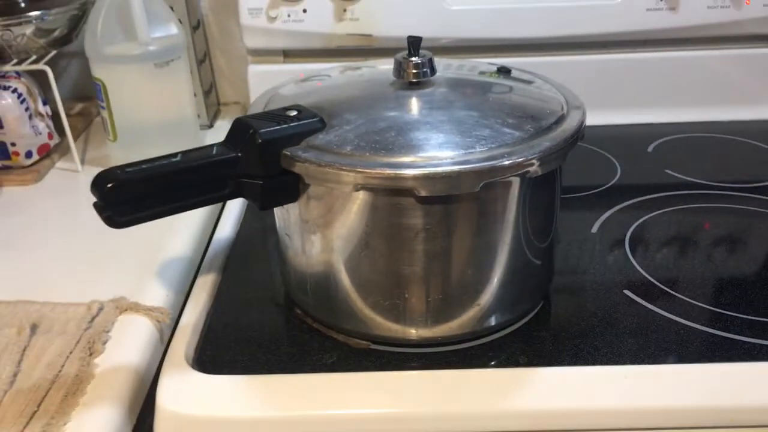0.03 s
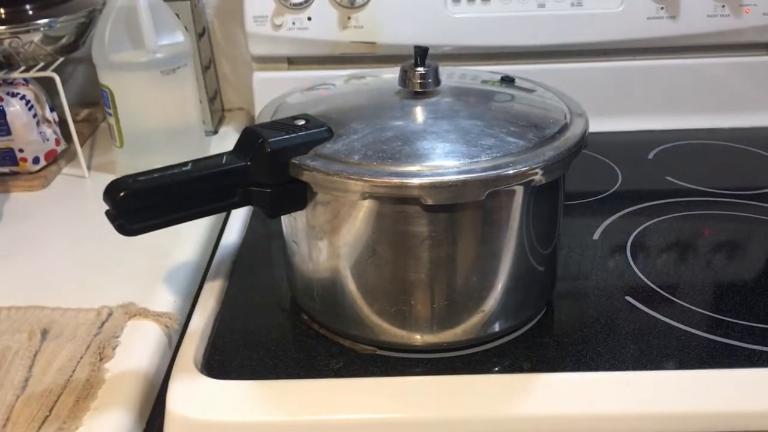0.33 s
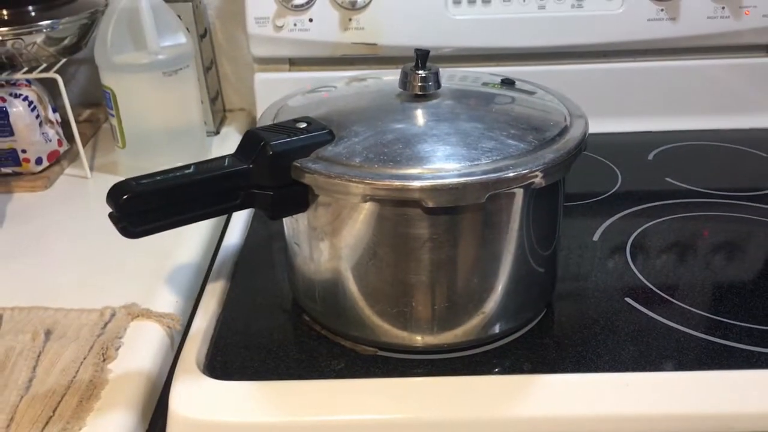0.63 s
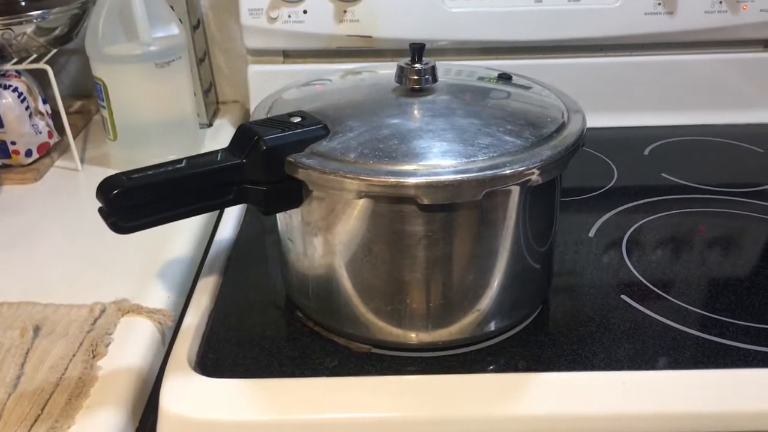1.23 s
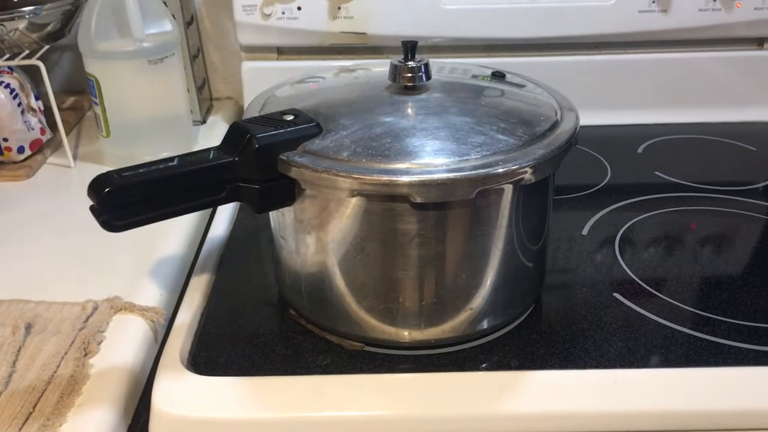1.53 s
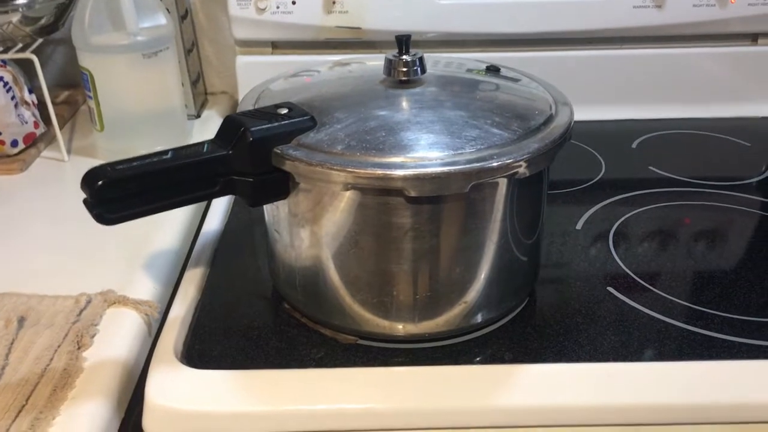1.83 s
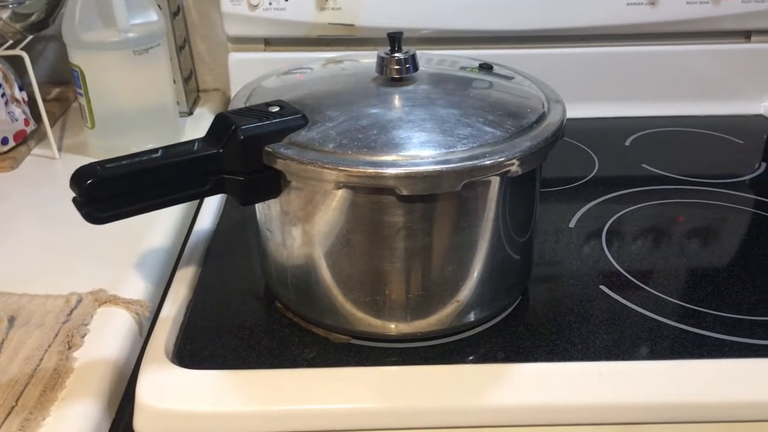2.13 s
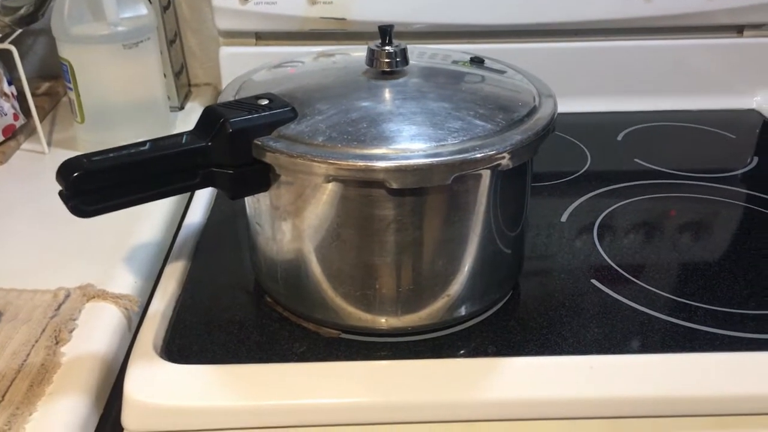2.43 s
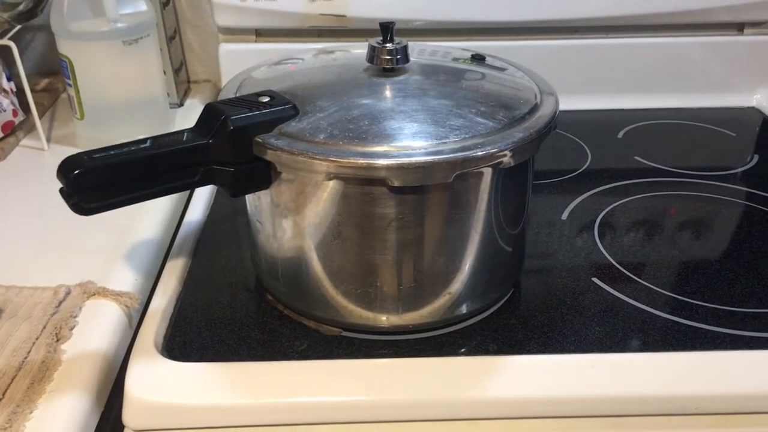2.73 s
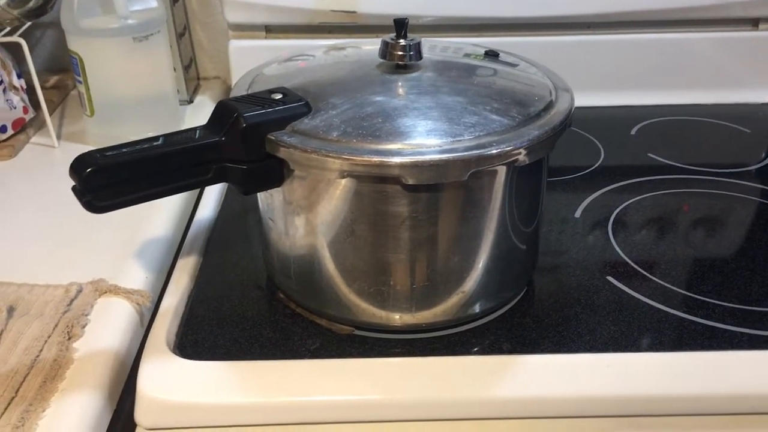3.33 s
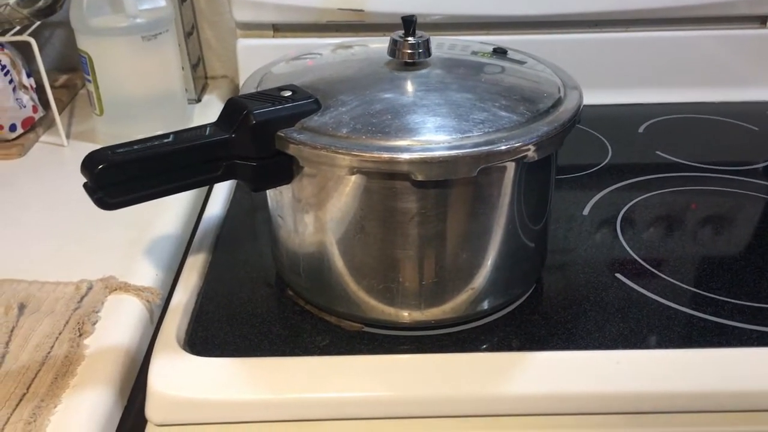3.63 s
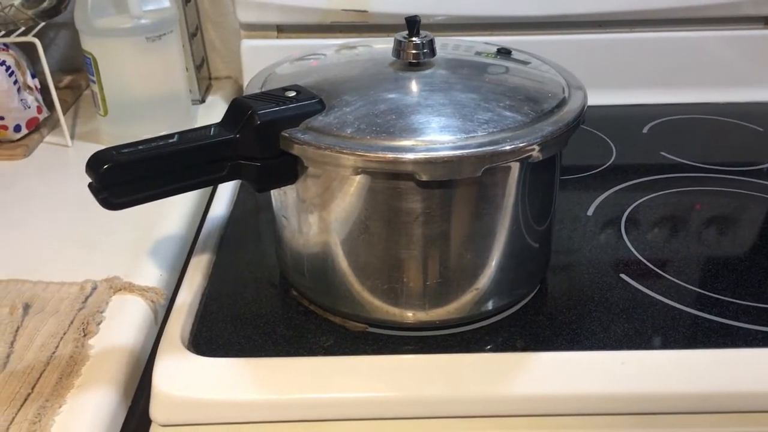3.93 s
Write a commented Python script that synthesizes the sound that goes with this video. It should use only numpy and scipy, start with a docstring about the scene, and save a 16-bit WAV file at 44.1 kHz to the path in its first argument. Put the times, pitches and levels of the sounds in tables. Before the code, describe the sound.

Steam chatters from a pressure cooker in quick, sharp spurts, heard nearby in a small kitchen. The weight rattles lightly on the lid between puffs and later knocks harder, over a faint simmer and low room hum.

```python
"""A pressure cooker steams on a stove in a small, hard kitchen. From the start a low hum fills the
room, the pot simmers and the vent leaks steadily. The weight rocks on the vent pipe: each tilt lets
out a puff of turbulent hiss, about twenty a second, and between puffs the weight drops back and sets
the lid ringing. The loudest puff and knock come near 1.6 s; from about 2.7 s on the knocks are
generally firmer."""
import sys
import numpy as np
from scipy import signal
from scipy.fft import rfft, irfft
from scipy.io import wavfile

SR = 44100
rng = np.random.default_rng(int(sys.argv[2]) if len(sys.argv) > 2 else 0)


def wav_record(signal):
    """Record a signal, one row per channel, as 16-bit PCM in the file named by sys.argv[1]."""
    frames = np.transpose(np.atleast_2d(signal))
    bounded = np.clip(frames, -1, 1)
    # unit amplitude maps onto the largest positive 16-bit level
    quanta = np.round(bounded * 32767).astype(np.int16)
    wavfile.write(sys.argv[1], SR, quanta)


N = 176400


def amp(db):
    """Amplitude ratio of a level in decibels."""
    return 10 ** (np.asarray(db) / 20)

def unit(x):
    """Normalisation to rms 1."""
    return x / np.sqrt(np.mean(x ** 2) + 1e-20)

def at_frequency(points, hz):
    """Interpolation of a table on a logarithmic frequency axis."""
    f, value = np.transpose(points)
    return np.interp(np.log(hz + 1), np.log(f + 1), value)

def add(mix, onset, sound):
    """Superposition of a sound on the mix, onset in seconds."""
    part = mix[max(round(onset * SR), 0):][:len(sound)]
    part += sound[:len(part)]

def bins():
    """Frequencies of the full-length Fourier spectrum."""
    return np.fft.rfftfreq(N, 1 / SR)

def noise(gain):
    """Spectral shaping of white noise, at rms 1."""
    return unit(irfft(rfft(rng.standard_normal(N)) * gain, N))

def wander(hz):
    """Random fluctuation: noise low-passed at hz."""
    return noise(1 / (1 + (bins() / hz) ** 4))

def rumble_and_hum():
    """Amplitude modulation: low noise and a wavering mains hum rise and fall under one envelope."""
    # spectrum of the kitchen rumble (f/Hz, relative level/dB)
    spectrum = [(12, -49), (24, -32), (30, -31), (37, -9), (45, -1), (62, -8.5), (75, -2), (100, -11),
                (180, -16.5), (500, -47.5), (1500, -10), (15000, -60)]
    # envelope of rumble and hum (t/s, level/dB)
    envelope = [(0.0, -58.5), (0.63, -57), (0.66, -63), (0.76, -58), (1.85, -62.5), (1.89, -53),
                (1.97, -61.5), (3.32, -63), (3.35, -57), (3.62, -61), (3.66, -68), (3.75, -60),
                (3.97, -58.5), (4.0, -67)]
    t = np.arange(N) / SR
    mains_hz = 60.2
    rumble = amp(0.5) * noise(amp(at_frequency(spectrum, bins())))
    hum = amp(-1 + 0.51 * wander(hz=10)) * unit(np.sin(2 * np.pi * mains_hz * t))
    return (rumble + hum) * amp(np.interp(t, *np.transpose(envelope)))

def simmer():
    """Transmission loss: the closed pot muffles bursting bubbles and the wash of boiling water."""
    # strength of the boiling (t/s, relative level/dB)
    envelope = [(0.0, -64), (0.1, -63), (0.15, -57), (0.81, -66), (1.29, -55.5), (1.3, -61.5),
                (1.82, -59.5), (2.15, -69.5), (2.95, -54.5), (3.01, -69), (3.11, -58.5), (3.17, -81),
                (3.21, -62), (3.44, -54), (3.84, -63.5), (4.0, -69)]
    # hollow spectrum heard through the wall (f/Hz, relative level/dB)
    through_wall = [(100, -17), (190, -22), (240, -11), (280, -4), (315, -6), (345, -14), (400, -9),
                    (460, -15), (600, -13), (900, -14), (2000, -75)]
    t = np.arange(N) / SR
    bubbles_per_s = 32
    bubbles = (rng.random(N) < bubbles_per_s / SR) * rng.standard_normal(N) * amp(18)
    water = bubbles + rng.standard_normal(N)
    muffled = unit(irfft(rfft(water) * amp(at_frequency(through_wall, bins())), N))
    return muffled * amp(np.interp(t, *np.transpose(envelope)) - 2.5)

def metal_resonance(x, spectrum):
    """Resonance: the weight and lid raise narrow peaks on a broad spectrum; white noise keeps its power."""
    # resonances of weight and lid (f/Hz, bandwidth/Hz, relative level/dB)
    modes = [(1570, 80, -3), (1970, 35, 1), (2210, 80, -2), (2470, 45, -2), (3310, 45, 0), (3465, 40, 0),
             (3605, 40, 2), (3858, 48, 5), (4040, 70, -1), (4493, 48, 5), (4688, 43, 5), (5187, 50, 6),
             (5410, 40, 2), (5512, 32, 4), (5675, 48, 3), (5791, 35, 2), (5944, 60, 0), (6126, 60, 1),
             (6282, 55, 2), (6545, 55, 2), (6750, 65, 2), (6891, 48, 3), (7095, 90, 4), (7427, 38, 4),
             (7610, 50, 0), (8110, 60, 0), (8300, 60, 1), (8489, 48, 3), (8748, 45, 1)]
    f = bins()
    peak_power = sum(amp(db + 1.5) ** 2 / (1 + (2 * (f - hz) / width) ** 2) for hz, width, db in modes)
    ring = np.sqrt(1 + peak_power)
    minimum_phase = -signal.hilbert(np.log(np.r_[ring, ring[-2:0:-1]])).imag[:len(f)]
    gain = unit(amp(at_frequency(spectrum, f)) * ring)
    return irfft(rfft(x) * gain * np.exp(1j * minimum_phase), N)

def steam():
    """Turbulent jet noise: each opening of the vent adds its power to that of a steady leak."""
    # puffs (peak t/s, half-power duration/s, relative hiss level/dB, rush level re hiss/dB)
    puffs = [(0.018, 0.034, -35.5, -14.5), (0.082, 0.025, -35, -16), (0.106, 0.017, -39.5, -14),
             (0.154, 0.023, -32, -15), (0.208, 0.023, -31.5, -17), (0.252, 0.02, -31, -16),
             (0.317, 0.026, -37, -14), (0.342, 0.017, -38, -22), (0.384, 0.027, -34, -22),
             (0.442, 0.02, -33, -17), (0.495, 0.031, -31, -28), (0.581, 0.042, -32.5, -17.5),
             (0.646, 0.021, -33.5, -14), (0.709, 0.027, -31.5, -16.5), (0.784, 0.032, -34.5, -16),
             (0.833, 0.019, -31.5, -14.5), (0.888, 0.028, -35, -13), (0.931, 0.025, -35, -13),
             (0.973, 0.023, -40, -22), (0.991, 0.015, -36, -11), (1.04, 0.03, -35.5, -14.5),
             (1.098, 0.028, -35.0, -22), (1.146, 0.037, -41, -22), (1.192, 0.034, -36.5, -16),
             (1.236, 0.023, -32.0, -15), (1.266, 0.038, -38.5, -13), (1.329, 0.016, -34, -14),
             (1.372, 0.02, -27.5, -16), (1.413, 0.03, -33, -17), (1.466, 0.015, -32.5, -10.5),
             (1.516, 0.016, -30.8, -11.5), (1.559, 0.015, -27.5, -14.5), (1.613, 0.018, -25, -18),
             (1.657, 0.038, -37, -14), (1.721, 0.02, -34.5, -9.5), (1.804, 0.022, -34, -15.5),
             (1.825, 0.018, -33.5, -8.5), (1.857, 0.02, -31.9, -8), (1.883, 0.038, -36.5, -18),
             (1.939, 0.023, -33, -15.5), (2.009, 0.039, -38.1, -13), (2.046, 0.018, -39.5, -9),
             (2.101, 0.041, -35.5, -11.5), (2.17, 0.034, -34.4, -11), (2.214, 0.017, -34.5, -11),
             (2.265, 0.029, -34.5, -12.5), (2.318, 0.027, -36.5, -11.5), (2.36, 0.032, -41.5, -10),
             (2.39, 0.025, -34, -15), (2.436, 0.033, -36.0, -14.5), (2.461, 0.042, -41.5, -12.5),
             (2.51, 0.021, -36, -11.5), (2.566, 0.021, -32, -11.5), (2.61, 0.019, -38, -12),
             (2.66, 0.024, -35, -12.5), (2.695, 0.025, -34.6, -16.5), (2.757, 0.032, -36, -14),
             (2.802, 0.02, -35.0, -14), (2.845, 0.033, -32.5, -12), (2.89, 0.021, -30.5, -13.5),
             (2.937, 0.038, -32, -15), (3.001, 0.014, -33, -15), (3.03, 0.024, -30.5, -18),
             (3.082, 0.042, -35.5, -14.5), (3.136, 0.021, -36, -13.5), (3.188, 0.024, -33.5, -13.5),
             (3.234, 0.02, -34, -10.5), (3.286, 0.025, -30.6, -14), (3.334, 0.022, -31.5, -17),
             (3.374, 0.027, -33, -11), (3.394, 0.023, -41, -18), (3.43, 0.029, -33, -14.5),
             (3.482, 0.023, -35.5, -16), (3.514, 0.019, -33.0, -12), (3.541, 0.029, -39, -11),
             (3.576, 0.021, -35.5, -9.5), (3.622, 0.024, -33.5, -14.5), (3.661, 0.026, -35.5, -11),
             (3.713, 0.017, -34.5, -15), (3.753, 0.023, -30.5, -14), (3.799, 0.017, -29, -13),
             (3.862, 0.013, -35, -12.5), (3.895, 0.031, -36.5, -12), (3.939, 0.019, -29, -15),
             (3.985, 0.023, -32, -14.5)]
    # spectrum of the jet's hiss (f/Hz, relative level/dB)
    hiss_spectrum = [(500, -63), (1500, -28.5), (2800, -13.5), (4000, -7), (4900, -5.5), (5600, -1.5),
                     (7100, -2.5), (7900, -3.5), (8800, -4), (9700, -5.5), (10500, -13), (11300, -10),
                     (13500, -12.5), (15800, -9.5)]
    # spectrum of the lower rush under the weight (f/Hz, relative level/dB)
    rush_spectrum = [(120, -22), (300, -6), (500, -18), (750, -5), (1200, -1), (1800, -3), (2250, -1),
                     (3000, -1.5), (5000, -15)]
    t = np.arange(N) / SR
    rise_share, squareness = 0.43, 2.115  # an exponent of 2 gives a Gaussian puff
    hiss_power, rush_power = np.full(N, amp(-62) ** 2), np.full(N, amp(-68.5) ** 2)  # the leak
    for peak, length, db, rush_db in puffs:
        near = slice(max(int((peak - 2 * length) * SR), 0), int((peak + 2 * length) * SR))
        flank_s = length * np.where(t[near] < peak, rise_share, 1 - rise_share)
        opening = 0.5 ** (abs((t[near] - peak) / flank_s) ** squareness)
        hiss_power[near] += opening * amp(db) ** 2
        rush_power[near] += opening * amp(db + rush_db) ** 2
    flutter = wander(hz=238)
    hiss = rng.standard_normal(N) * np.sqrt(hiss_power) * amp(0.5 + 0.9 * flutter)
    rush = rng.standard_normal(N) * np.sqrt(rush_power) * amp(0.5 + 1.75 * flutter)
    leak_fizz = amp(-52) * noise(1 - 1 / (1 + (bins() / 10200) ** 6))  # above 10.2 kHz
    return metal_resonance(hiss, hiss_spectrum) + metal_resonance(rush, rush_spectrum) + leak_fizz

def lid_knock(detune):
    """Impact excitation: a dull thud and the lid's damped modes, each mistuned by about detune."""
    # modes of the lid (f/Hz, relative level/dB, T60/s)
    modes = [(287, -31, .07), (904, -13, 0.065), (992.6, -0.5, 0.061), (1000, -13, 0.074),
             (1224, -8.5, 0.022), (1593, -8.5, 0.043), (1959, -6, 0.037), (2460, -29, .025)]
    t = np.arange(SR // 8) / SR
    rise_s, thud_decay_s = 0.00035, 0.003
    tuning = rng.normal(1, detune, len(modes)) if detune else np.ones(len(modes))
    ring = sum(amp(db - 60 * t / t60) * np.sin(2 * np.pi * hz * ratio * t)
               for (hz, db, t60), ratio in zip(modes, tuning))
    thud_band = signal.butter(2, [400, 1800], "band", fs=SR, output="sos")
    thud = unit(signal.sosfilt(thud_band, rng.standard_normal(len(t)))) * np.exp(-t / thud_decay_s)
    return (ring + amp(-6) * thud) * (1 - np.exp(-t / rise_s))

def rocking_weight():
    """Repeated impacts: firm landings of the weight amid light chatter, a Poisson train of taps."""
    # landings on the vent pipe (t/s, relative level/dB)
    landings = [(0.127, -49), (0.169, -45), (0.209, -56), (0.233, -43.5), (0.283, -47.5), (0.356, -45.5),
                (0.401, -45), (0.464, -48), (0.502, -45), (0.53, -44.5), (0.555, -43), (0.593, -50),
                (0.618, -43), (0.808, -51), (0.858, -46.5), (0.909, -43.5), (1.091, -43), (1.131, -47),
                (1.193, -46.5), (1.23, -49), (1.347, -48), (1.388, -46.5), (1.415, -46), (1.444, -43.5),
                (1.486, -46), (1.537, -47), (1.582, -36), (1.639, -42), (1.688, -44), (1.724, -57),
                (1.826, -46), (1.853, -49), (1.879, -48), (1.905, -41), (1.936, -46.5), (2.136, -47.5),
                (2.162, -52), (2.193, -45.5), (2.233, -46.5), (2.272, -48), (2.416, -47.5), (2.479, -49),
                (2.564, -52), (2.672, -41.5), (2.815, -44), (2.869, -44), (2.908, -42), (2.94, -40),
                (3.014, -43), (3.052, -39.5), (3.084, -48), (3.2, -43), (3.252, -41.5), (3.31, -41),
                (3.349, -39), (3.382, -46.5), (3.401, -44), (3.439, -41.5), (3.462, -39.5), (3.494, -42.5),
                (3.54, -45), (3.602, -41), (3.644, -41), (3.691, -42), (3.729, -41.5), (3.764, -42),
                (3.787, -48), (3.915, -40), (3.959, -41)]
    taps_per_s = 26
    taps = (rng.random(N) < taps_per_s / SR) * rng.uniform(-1.34, 1, N)
    chatter = signal.oaconvolve(taps, lid_knock(detune=0))[:N]
    knocks = np.zeros(N)
    for onset, db in landings:
        add(knocks, onset, amp(db + 3.5) * lid_knock(detune=0.0086))
    return knocks + amp(-47) * chatter

def room_tail():
    """Diffuse reverberation: noise decays exponentially, each band at its own rate."""
    # reverberation time of the kitchen (f/Hz, T60/s)
    decay_times = [(200, 0.47), (1000, 0.26), (5000, 0.52), (15000, 0.23)]
    hz, t, spectrogram = signal.stft(rng.standard_normal(SR // 2), SR, nperseg=256)
    decay = amp(-60 * t / at_frequency(decay_times, hz)[:, None])
    response = signal.istft(spectrogram * decay, SR, nperseg=256)[1]
    response[:SR // 200] = 0  # the tail arrives after 5 ms
    return response / np.linalg.norm(response)

def kitchen(x, room_db):
    """Reflection: direct sound, close echoes, then a diffuse room tail whose colour slowly drifts."""
    out = x.copy()
    echoes = rng.random(size=(8, 2))  # from the lid, hob and back panel
    earliest_s, spread_s = 0.000973, 0.004
    for lag, polarity in echoes:
        echo = x * np.sign(polarity - 0.5) * amp(-15) / np.sqrt(len(echoes))
        add(out, earliest_s + lag * spread_s, echo)
    drift = np.array([wander(hz=2.12) for _ in range(4)])
    for share in drift / np.linalg.norm(drift, axis=0):  # four tails share a constant power
        out += amp(room_db) * signal.fftconvolve(x * share, room_tail())[:N]
    return out / np.sqrt(1 + amp(room_db) ** 2)

def scene():
    """Superposition of the cooker's sounds and the hum of the room, in one channel."""
    puffs = kitchen(steam(), room_db=-10)
    knocks = kitchen(rocking_weight(), room_db=-4)
    return (puffs + knocks + simmer() + rumble_and_hum())[None]

def record(dry):
    """Band limiting: a steep linear-phase low-pass at 15.85 kHz."""
    low_pass = signal.firwin(801, 15850, window=("kaiser", 9), fs=SR)
    return signal.oaconvolve(dry, low_pass[None], "same")

dry = scene()
out = record(dry)
wav_record(out)
```